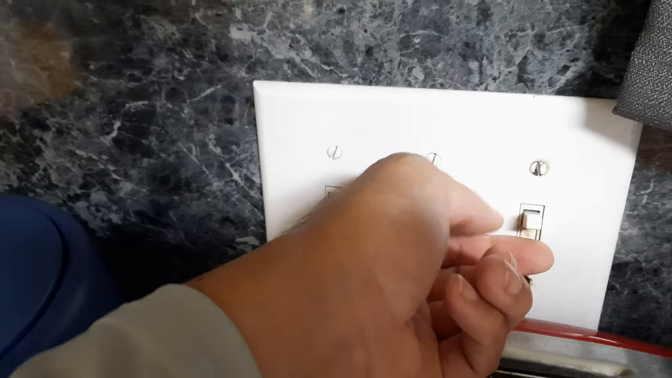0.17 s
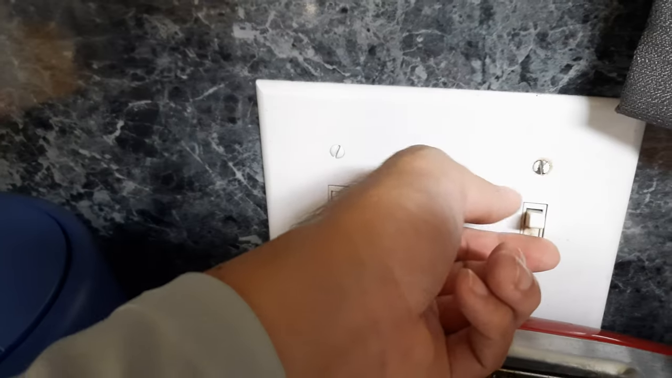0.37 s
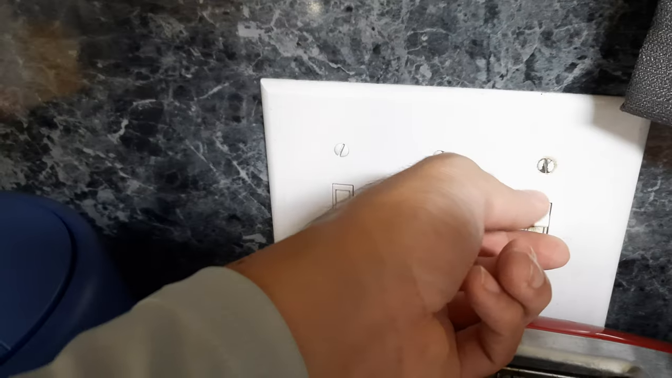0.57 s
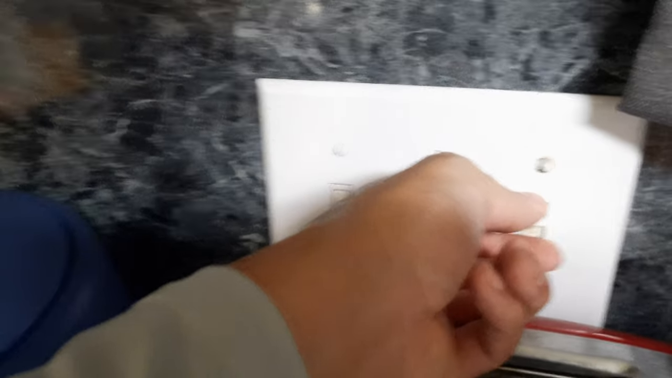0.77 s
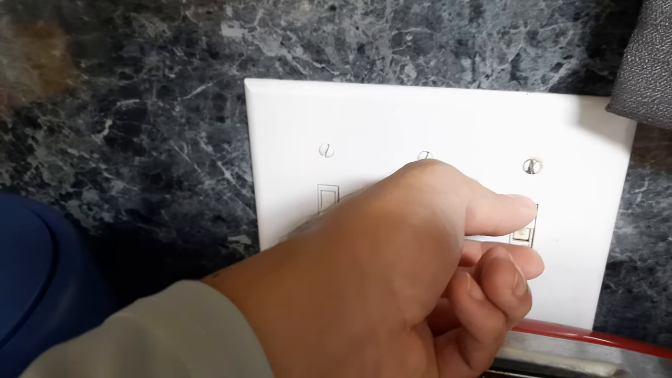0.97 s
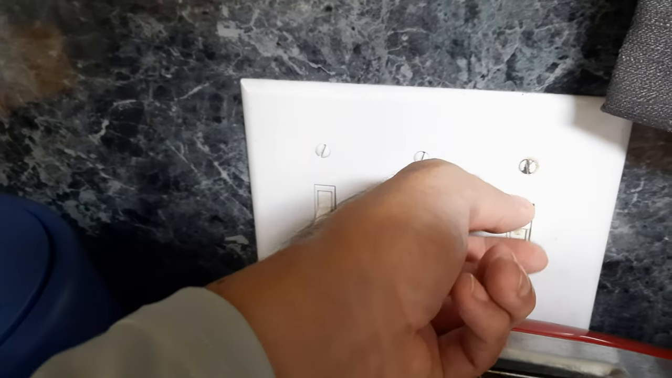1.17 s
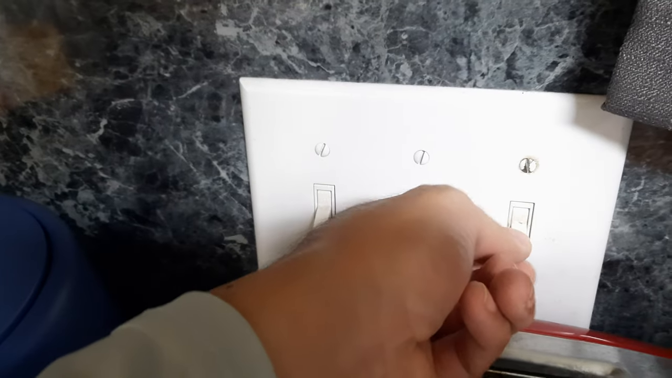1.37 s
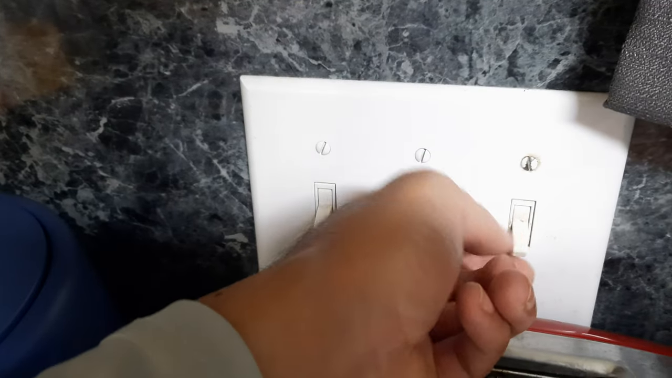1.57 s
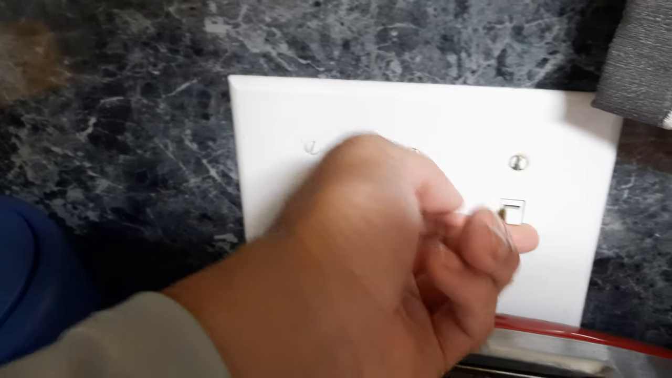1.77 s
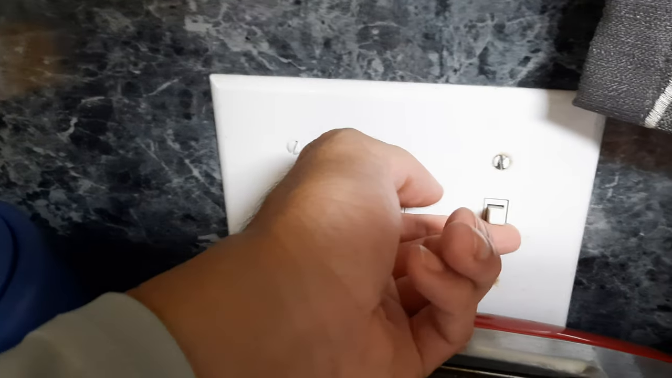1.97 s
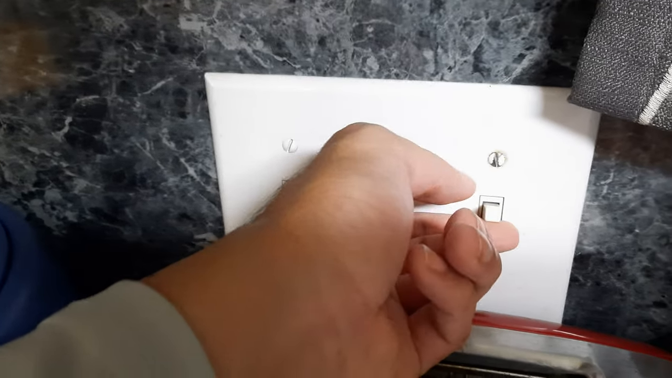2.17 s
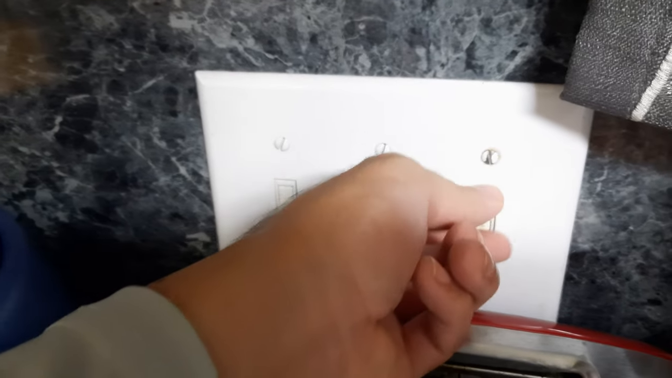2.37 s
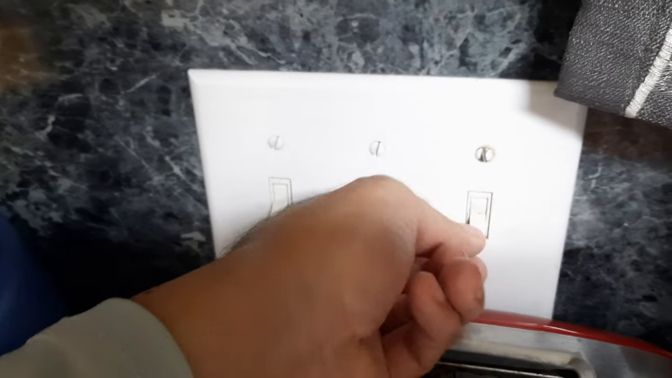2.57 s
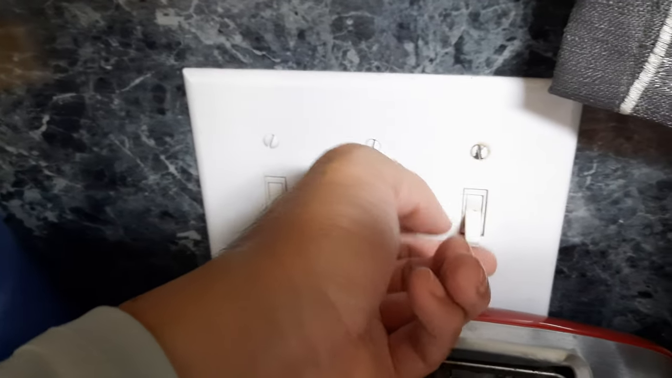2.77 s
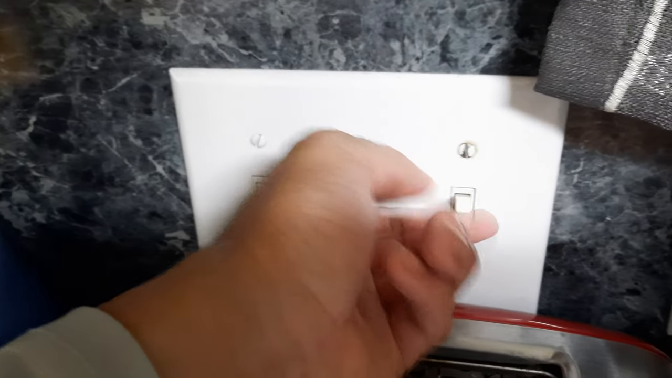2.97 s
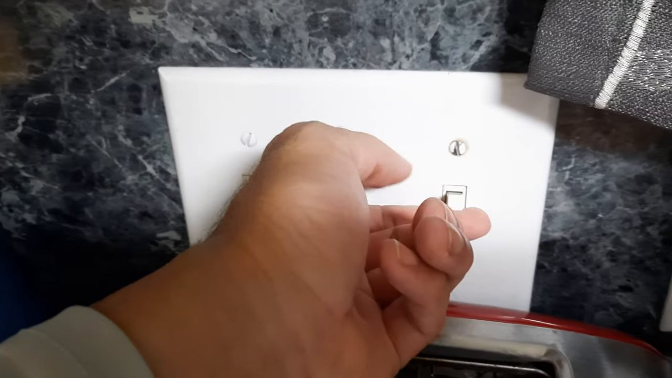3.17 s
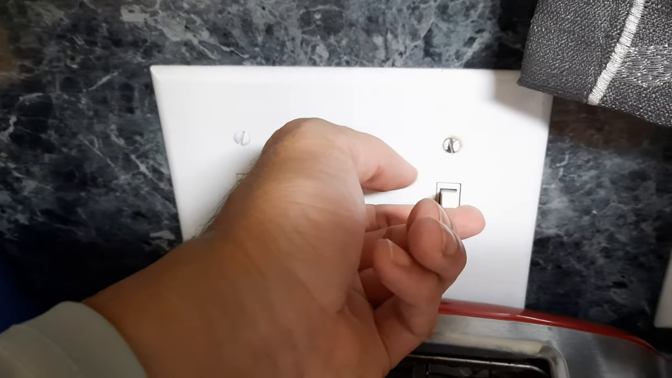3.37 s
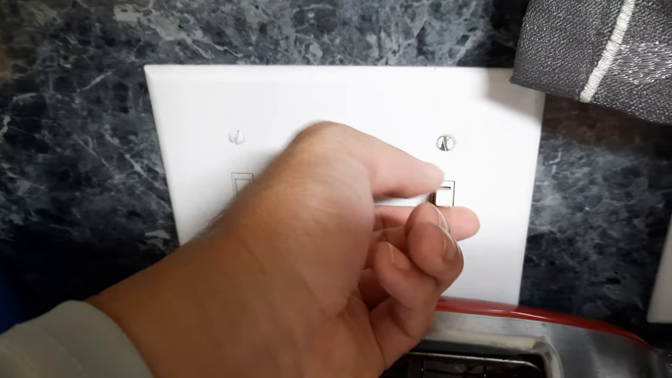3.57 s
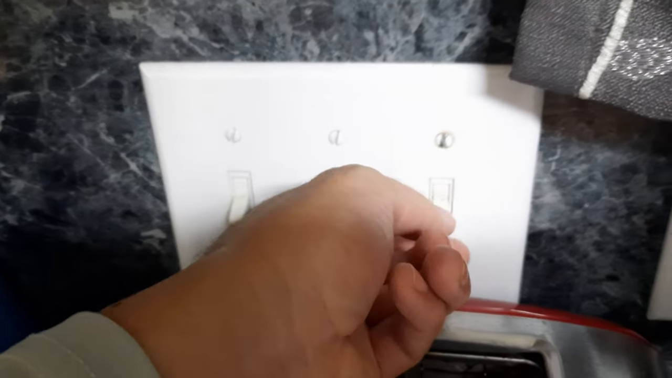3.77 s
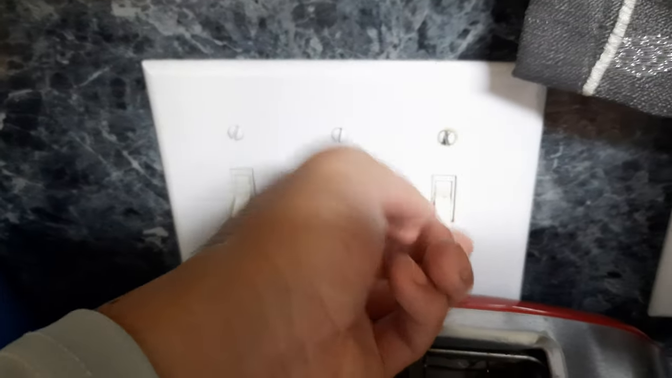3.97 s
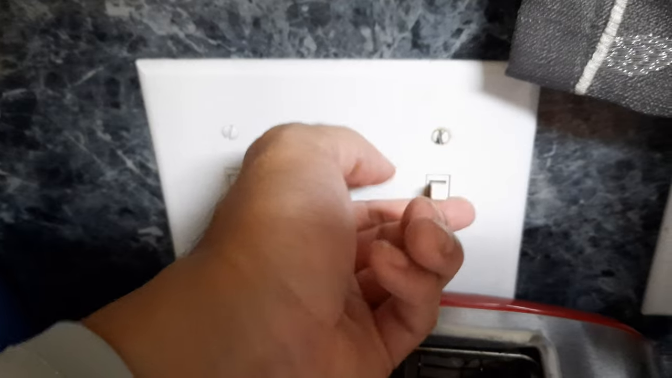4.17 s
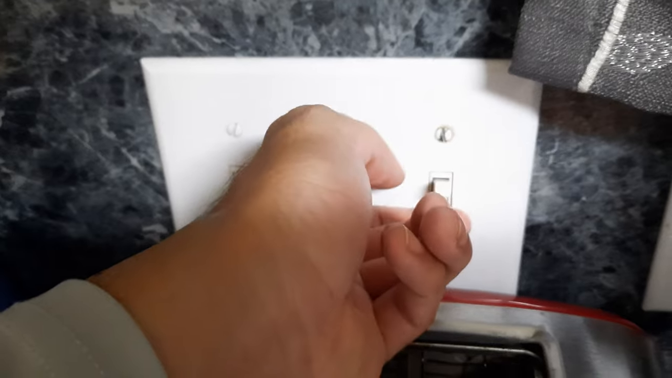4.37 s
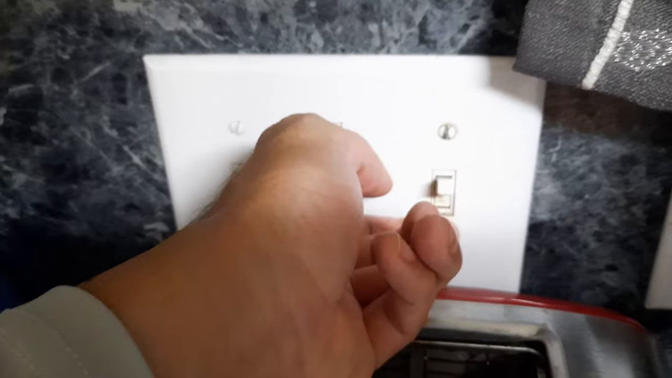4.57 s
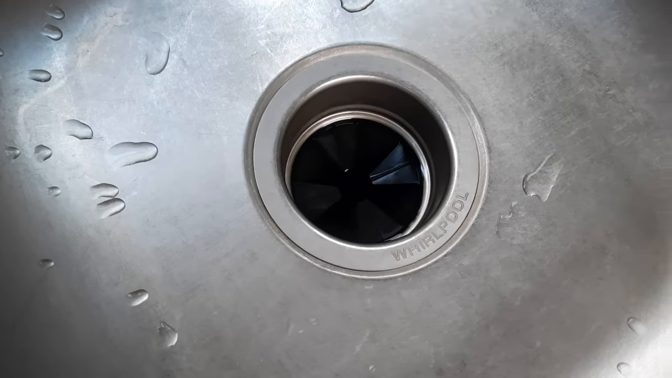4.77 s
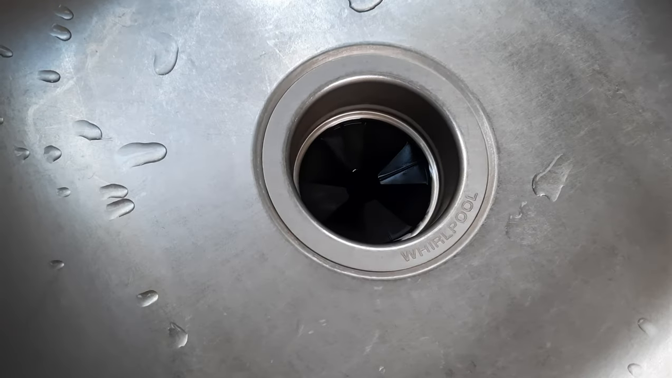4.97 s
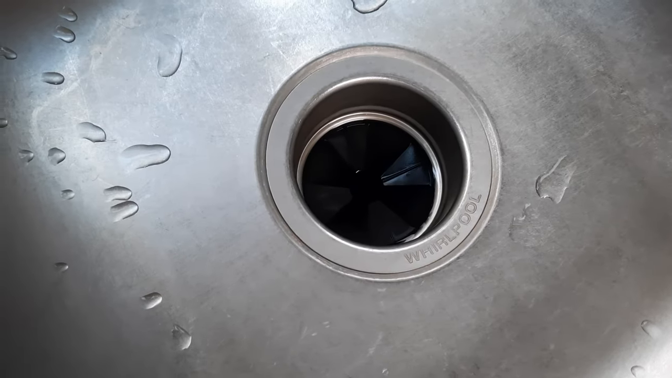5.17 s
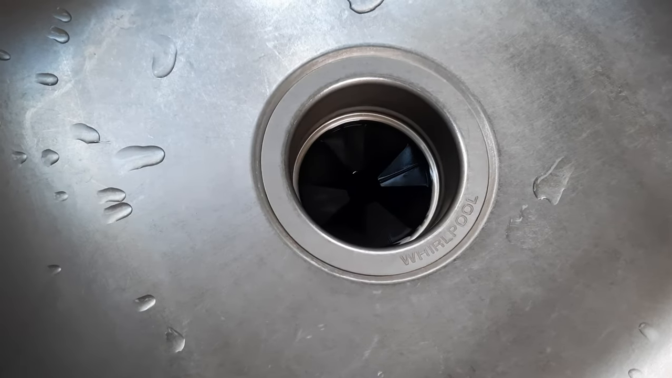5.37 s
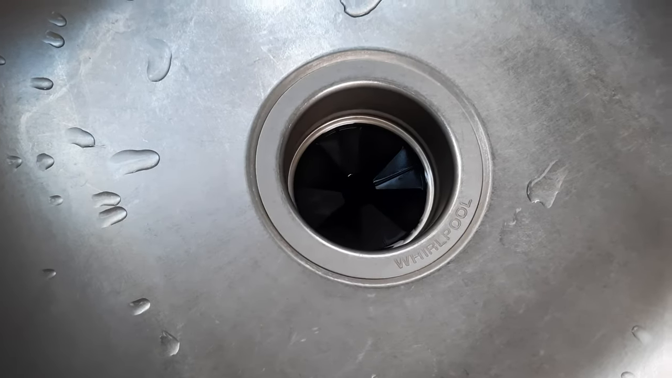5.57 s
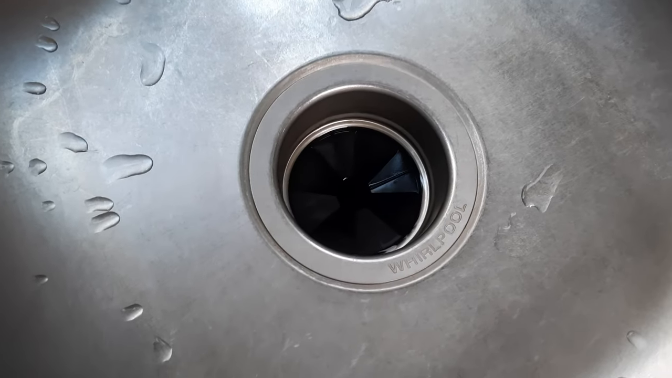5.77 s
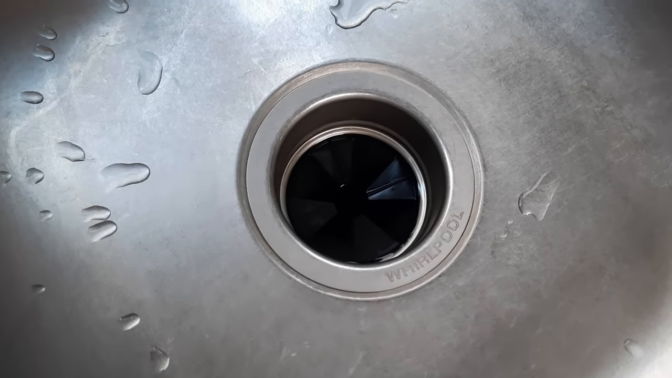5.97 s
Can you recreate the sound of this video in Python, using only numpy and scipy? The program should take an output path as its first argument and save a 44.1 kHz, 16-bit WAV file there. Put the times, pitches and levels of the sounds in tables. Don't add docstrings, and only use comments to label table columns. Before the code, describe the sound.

A plastic wall switch is flipped repeatedly with sharp clacks and two softer, slower clicks, amid faint finger fumbling in a quietly humming kitchen.

```python
import sys
import numpy as np
from scipy import signal
from scipy.fft import irfft, next_fast_len
from scipy.io import wavfile
from scipy.ndimage import uniform_filter1d

SR = 44100
rng = np.random.default_rng(int(sys.argv[2]) if len(sys.argv) > 2 else 0)


def invert_db(level):
    return 10 ** (np.asarray(level, dtype=float) / 20)


def to_wav(s):
    ch = np.atleast_2d(s).T
    pcm = np.round(np.clip(ch, -1, 1) * 32767)
    wavfile.write(sys.argv[1], SR, pcm.astype(np.int16))


N = 265923
T = np.arange(N) / SR

# f/Hz, level/dB per Hz
AIR = [(180, -10.5), (260, -3.5), (500, -8.5), (900, -13), (1600, -17.5), (1900, -21), (3000, -22),
       (4000, -26), (14000, -27.5), (16400, -29.5)]
# f/Hz, level/dB per Hz
RUMBLE = [(18, -28), (30, -20.5), (45, -3.5), (58, -3), (80, -1), (100, -5.5), (125, -6.5), (150, -14),
          (240, -16.5), (340, -46.5)]
# t/s, level/dB
HANDLING = [(0.0, -65.5), (0.47, -61), (1.59, -62), (1.95, -58.5), (2.35, -63.5), (2.65, -59.5),
            (4.3, -61.5), (4.52, -64), (5.88, -68), (6.03, -61.5)]
# f/Hz, level/dB
HUM = [(120, -72), (241, -72.5), (360, -81), (480, -82)]
# f/Hz, width/Hz, level/dB
WHINE = [(820, 14, -84), (1073, 40, -80.5), (1316, 58, -81.5), (1412, 53, -81), (1574, 42, -82.5),
         (2880, 260, -94)]
# start t/s, whine level/dB
WHINE_STEPS = [
    (0, -1),
    (.27, -7),
    (4.55, -10.5),
    (4.8, 0.5),
    (5.95, -8.5),
]
STEP_S = 0.025

# f/Hz, width/Hz, level/dB
SLEEVE = [(800, 350, -6), (1290, 370, -1), (2360, 370, -3), (3500, 830, -3.5), (4670, 580, -12),
          (6270, 1040, -9.5), (8900, 3000, -19)]
FINGER = [(1560, 150, -2), (2020, 400, -8.5), (2708, 310, -2)]
NAIL = [(2900, 380, 0.97), (4000, 800, 0.029)]
PIVOT = [(347, 400, 2.5), (1190, 540, 15), (2600, 1200, 3), (6000, 2200, -20)]
# t/s, level/dB, length/ms, fade/ms, resonances
RUBS = [
    (.272, -56, 19, 36, SLEEVE),
    (1.330, -63.5, 26, 5.5, PIVOT),
    (2.145, -80.5, 72, 20, FINGER),
    (2.228, -65, 47, 20, FINGER),
    (2.370, -80.5, 30, 22, NAIL),
    (3.755, -55.5, 32, 17, PIVOT),
    (4.570, -80.5, 19, 12, NAIL),
]

# t/s, force level/dB, contact edge f/Hz
TAPS = [(0.3662, -40, 940), (.5700, -59, 600), (0.683, -78, 200), (0.8551, -49, 295), (0.878, -51.5, 250),
        (1.3290, -55.5, 4000), (1.5450, -54, 305), (2.026, -48, 1010), (2.189, -55.5, 250),
        (2.3361, -41.5, 650), (2.367, -58, 600), (2.53, -58.5, 3030), (3.2599, -45, 690),
        (3.3026, -41, 294), (3.732, -65.5, 3500), (3.7548, -44.5, 2490), (3.7680, -51, 2225),
        (4.0660, -67, 2000), (4.3900, -49, 250), (4.5500, -51.5, 280)]
TAP_THUD_DB = 12
TAP_CRACK_DB, CRACK_DB_PER_OCTAVE = -4, 10
# f/Hz, level/dB, time to fall 60 dB/s
PLATE = [(510, -9, 0.041), (623, -5, 0.027), (824, 3.5, 0.015), (1038, -8, 0.033), (1262, -9.5, 0.025),
         (1530, -12.5, 0.016), (1640, -16, 0.024), (2100, -13, 0.014), (2312, -16, 0.024),
         (2657, -10, 0.024), (2939, -13, 0.019), (3326, -10.5, 0.011), (3780, -17, .014),
         (4830, -25.5, 0.015), (5750, -17, 0.033), (7800, -23.5, .014)]
# f/Hz, level/dB, time to fall 60 dB/s
WALL = [(145, -12.5, 0.083), (185, -9, 0.091), (254, -8.5, 0.052), (313.5, -14.5, 0.079)]
# f/Hz, level/dB, time to fall 60 dB/s
SINK = [(186.6, -22.5, 0.98), (195.7, -29, 0.37), (332, -39, .33), (618, -41, .35), (744, -44, 0.25),
        (978, -40, .3)]
# f/Hz, level/dB per Hz
CRACK = [(1000, -28), (3000, -24), (4500, -35), (7500, -43), (10000, -48.5), (15000, -54)]
CRACK_T60_S = 0.017

# edge f/Hz, wall thud level/dB, crack level/dB
SNAP = (3880, -2, 5)
EASE = (1850, 3, -13.5)
# delay t/s, force level/dB
BOUNCE_DOWN = [(-.0014, -24), (0, -1), (.0013, -2), (.0046, 3.5), (.0071, -5), (.0082, -4.5)]
BOUNCE_UP = [(-.0025, -32), (0, -1.5), (.0024, 1.5), (.0036, -4.5), (.0072, -2.5)]
BOUNCE_SLOW = [(0, -5.5), (.0047, 1), (.0120, -5.5)]
# t/s, level/dB, bounce pattern, first contact
FLIPS = [
    (1.361, -28.5, BOUNCE_SLOW, EASE),
    (1.7911, -15, BOUNCE_DOWN, SNAP),
    (2.543, -14.5, BOUNCE_UP, SNAP),
    (3.0245, -15, BOUNCE_DOWN, SNAP),
    (3.777, -27, BOUNCE_SLOW, EASE),
    (4.087, -15, BOUNCE_DOWN, SNAP),
]
DULLING_S, THUD_DB_PER_1_4_MS, CRACK_DB_PER_MS = 0.034, 0.5, -0.73
FLIP_FAR, TAP_FAR, BLOW_S = 3.19, 1.5, 0.0041

# f/Hz, time to fall 60 dB/s, level/dB
ROOM = [(152.3, 0.29, -13.5), (250, 0.42, -16.5), (350, .25, -11.5), (600, 0.24, -14), (850, 0.42, -32),
        (1164, 0.25, -18.5), (1788, .26, -18), (2550, .24, -24), (4000, .2, -21.5), (6200, .18, -22),
        (8900, 0.19, -18), (13030, 0.13, -16.5)]


def shaped(gain, count=N):
    size = next_fast_len(count, True)
    hz = np.arange(size // 2 + 1) * SR / size + 1
    chance = rng.standard_normal((2, len(hz)))
    noise = irfft((chance[0] + 1j * chance[1]) * gain(hz), size)[:count]
    return noise / np.std(noise)


def slope(points):
    f, db = np.transpose(points)
    return lambda hz: invert_db(np.interp(np.log(hz), np.log(f), db, left=-120, right=-120))


def peak(centre_hz, width_hz):
    return lambda hz: 1 / np.sqrt(1 + (2 * (hz - centre_hz) / width_hz) ** 4)


def walk(rate):
    levels = rng.standard_normal(1000)
    position = T * rate
    k = position.astype(int)
    blend = (1 - np.cos(np.pi * (position - k))) / 2
    return levels[k] * (1 - blend) + levels[k + 1] * blend


def whine_level():
    starts, db = np.transpose(WHINE_STEPS)
    held = db[np.searchsorted(starts[1:], T)]
    return uniform_filter1d(held, int(STEP_S * SR) + 1)


def kitchen():
    air = invert_db(-73 + 0.6 * walk(11)) * shaped(slope(AIR))
    handling_db = np.interp(T, *np.transpose(HANDLING))
    rumble = invert_db(handling_db + 4.5 + 4.2 * walk(8)) * shaped(slope(RUMBLE))
    hum = sum(invert_db(db + 2.8 * walk(5.4)) * np.sin(2 * np.pi * hz * T) for hz, db in HUM)
    whine = shaped(lambda hz: sum(invert_db(db) / np.sqrt(w) * peak(f, w)(hz) for f, w, db in WHINE))
    return air + rumble + hum + invert_db(whine_level() - 73 + 2.2 * walk(14)) * whine


def rubs():
    ms = 1000 * T[:SR // 2]
    out = np.zeros(N)
    grain = invert_db(2.5 * walk(90))
    for s, db, length_ms, fade_ms, peaks in RUBS:
        start = np.clip(ms / 4, 0, 1)
        end = np.exp(-np.clip(ms - length_ms, 0, None) / fade_ms)
        noise = shaped(lambda hz: sum(invert_db(d) * peak(f, w)(hz) for f, w, d in peaks), count=len(ms))
        i = int(s * SR)
        out[i:i + len(ms)] += invert_db(db) * start * end * noise
    return out * grain


def taps():
    blows = []
    for s, force_db, edge_hz in TAPS:
        crack_db = TAP_CRACK_DB + CRACK_DB_PER_OCTAVE * np.log2(edge_hz / 1000)
        blows.append((s, force_db, edge_hz, TAP_THUD_DB, crack_db, TAP_FAR))
    return blows


def flips():
    blows = []
    for s, db, bounces, (edge_hz, thud_db, crack_db) in FLIPS:
        for lag, force_db in bounces:
            edge = edge_hz * np.exp(-lag / DULLING_S)
            thud = thud_db + THUD_DB_PER_1_4_MS * lag / 0.0014
            crack = crack_db + CRACK_DB_PER_MS * lag / 0.001
            far = FLIP_FAR * (lag == 0)
            blows.append((s + lag, db + force_db, edge, thud, crack, far))
    return blows


def ring(modes, t):
    out = np.zeros(len(t))
    for k, (hz, db, t60) in enumerate(modes):
        out += (-1) ** k * invert_db(db - 60 * t / t60) * np.sin(2 * np.pi * hz * t)
    return out


def switch():
    t = T[:SR // 10]
    plate, wall = ring(PLATE, t), ring(WALL, t)
    rattle = shaped(slope(CRACK))
    out, shake = np.zeros((2, N + len(t))), np.zeros(N)
    for s, force_db, edge_hz, thud_db, crack_db, far in taps() + flips():
        i = int(s * SR)
        crack = invert_db(crack_db - 60 * t / CRACK_T60_S) * rattle[i:i + len(t)]
        push = signal.butter(2, edge_hz, fs=SR, output="sos")
        bright = signal.butter(1, 2 * edge_hz, fs=SR, output="sos")
        body = signal.sosfilt(push, plate + invert_db(thud_db) * wall)
        blow = invert_db(force_db) * (body + invert_db(-17) * signal.sosfilt(bright, crack))
        out[0, i:i + len(t)] += blow
        out[1, i:i + len(t)] += blow * far * np.exp(-t / BLOW_S)
        shake[i] = invert_db(1.43 * force_db + 3.5)
    sink = signal.fftconvolve(shake, ring(SINK, T[:SR]))[:N]
    return out[:, :N] + sink


def room(x):
    t = T[:SR // 2]
    tail = np.zeros(len(t))
    for hz, t60, db in ROOM:
        band = shaped(peak(hz, hz * 2 / 5), count=len(t))
        tail += invert_db(db - 60 * t / t60) * band * np.sqrt(hz / t60)
    build_up = 1 - np.exp(-(t / 0.0068) ** 2)
    return signal.fftconvolve(x, tail * build_up * invert_db(-67.5))[:N]


def scene():
    near, far = switch() + rubs()
    no_bass = signal.butter(2, 110, "high", fs=SR, output="sos")
    near = signal.sosfilt(no_bass, near + room(far))
    return (near + kitchen())[None]


def top_cut(x):
    return signal.sosfilt(signal.butter(12, 16460, fs=SR, output="sos"), x)


def record(dry):
    mix = np.tanh(1.189 * dry) / 1.263
    return top_cut(mix)


dry = scene()
out = record(dry)
to_wav(out)
```